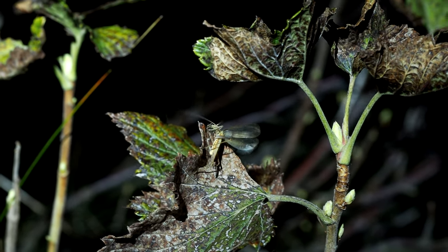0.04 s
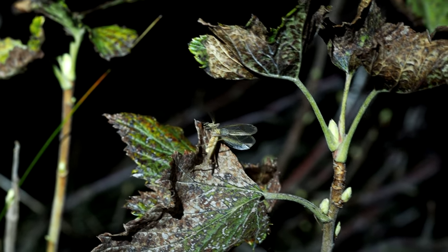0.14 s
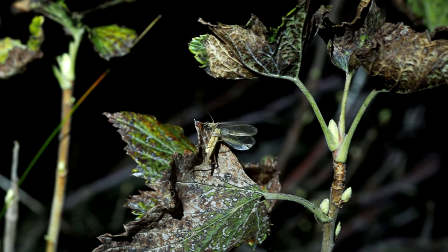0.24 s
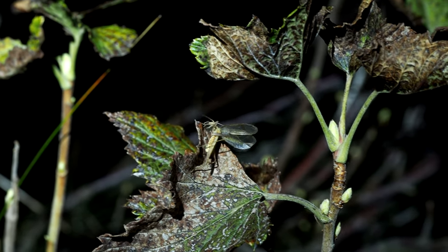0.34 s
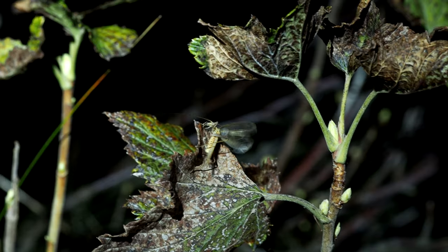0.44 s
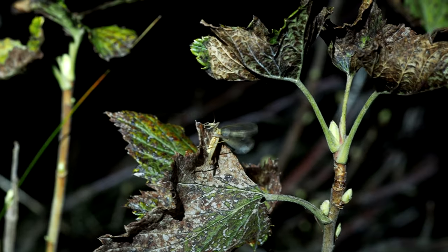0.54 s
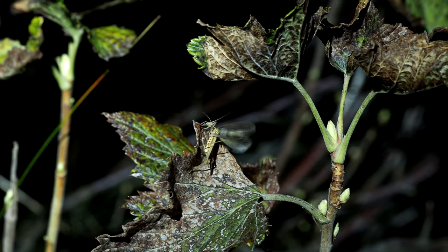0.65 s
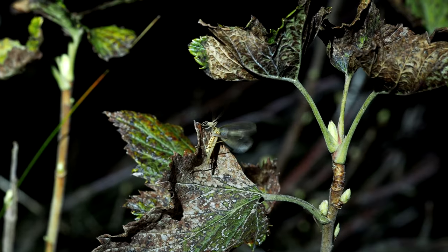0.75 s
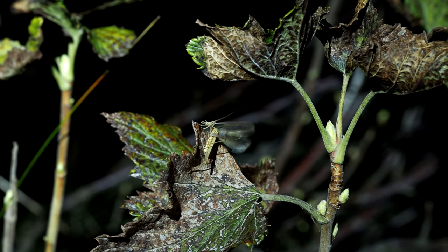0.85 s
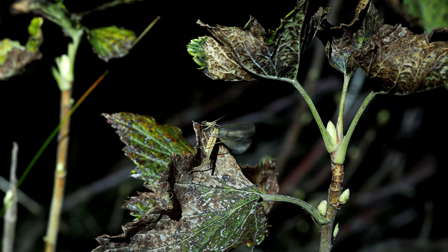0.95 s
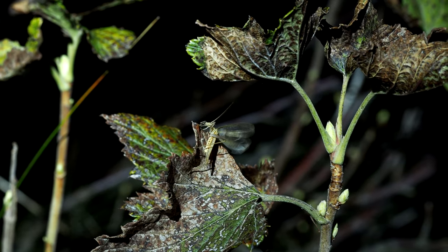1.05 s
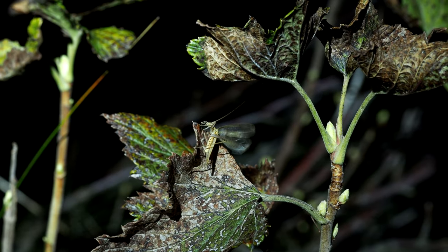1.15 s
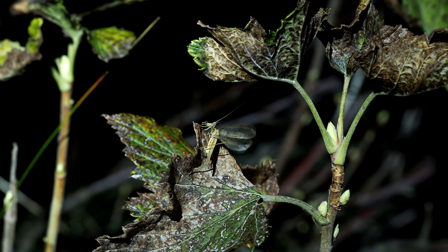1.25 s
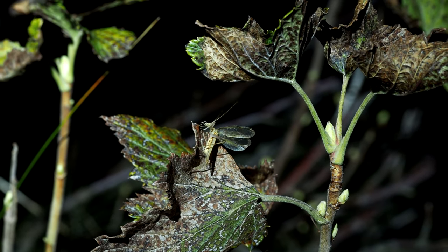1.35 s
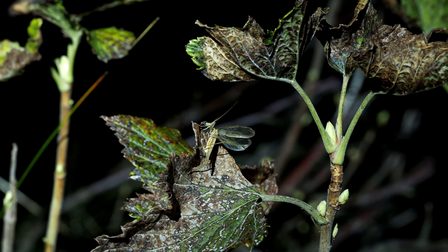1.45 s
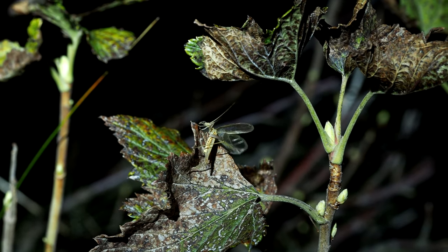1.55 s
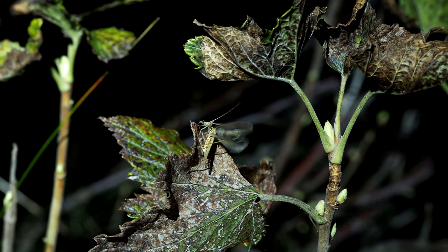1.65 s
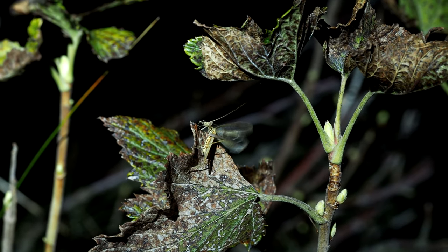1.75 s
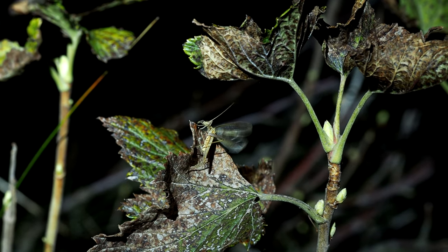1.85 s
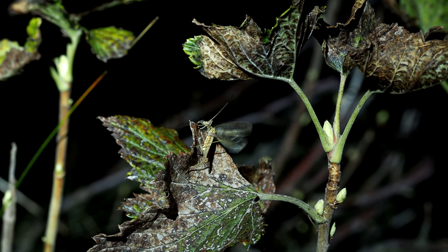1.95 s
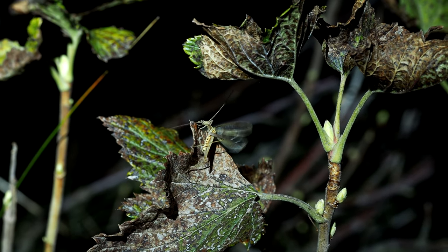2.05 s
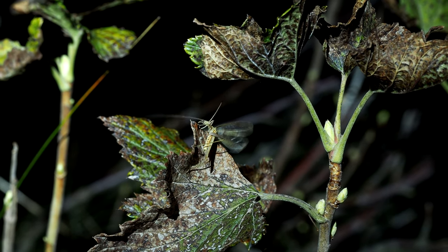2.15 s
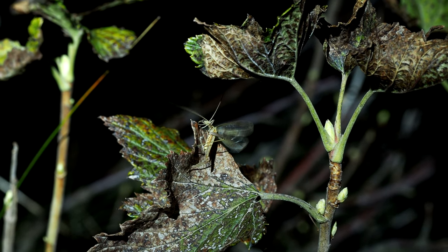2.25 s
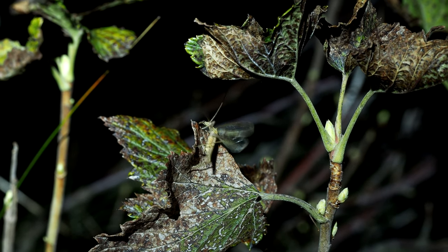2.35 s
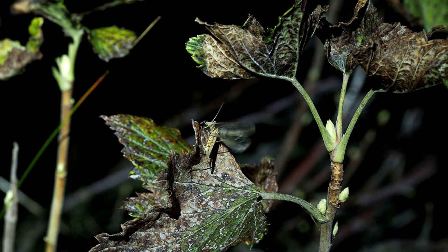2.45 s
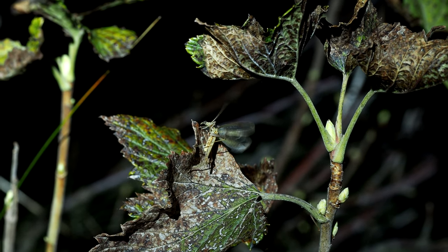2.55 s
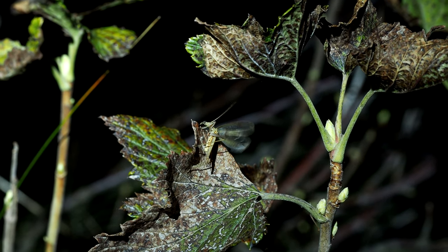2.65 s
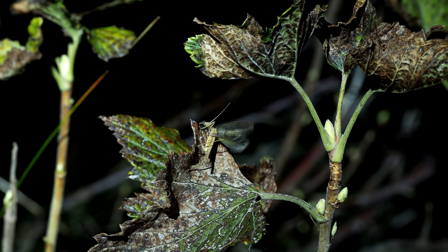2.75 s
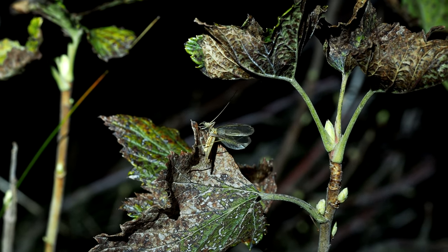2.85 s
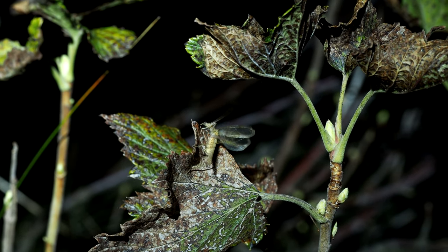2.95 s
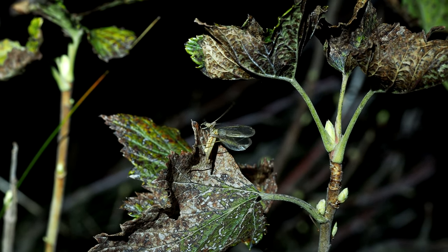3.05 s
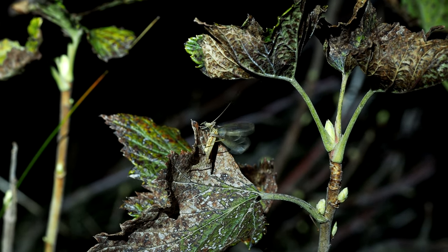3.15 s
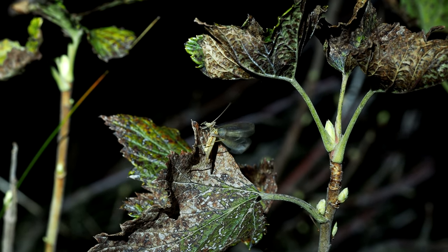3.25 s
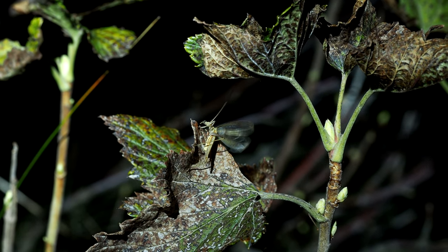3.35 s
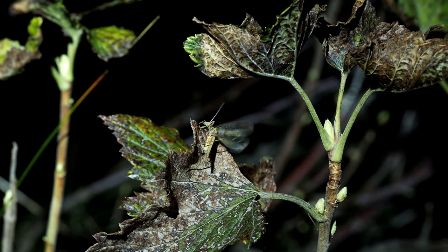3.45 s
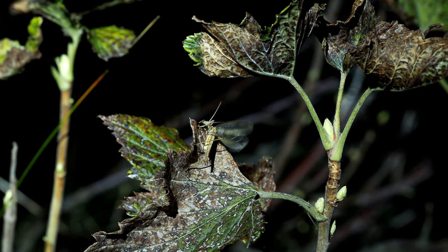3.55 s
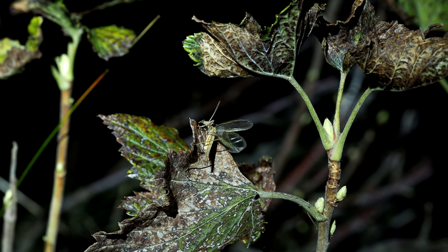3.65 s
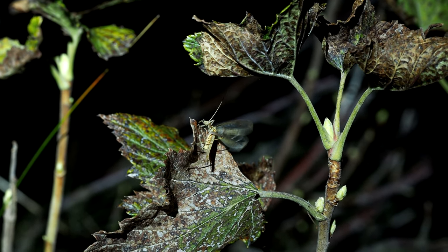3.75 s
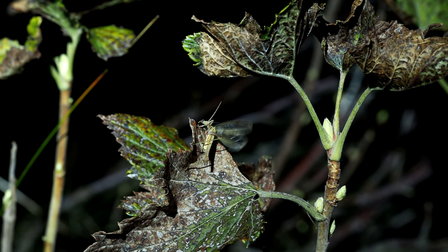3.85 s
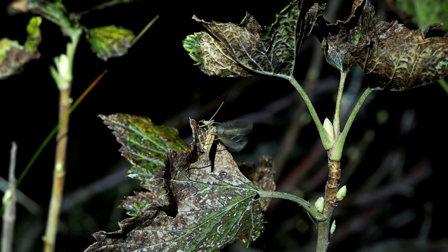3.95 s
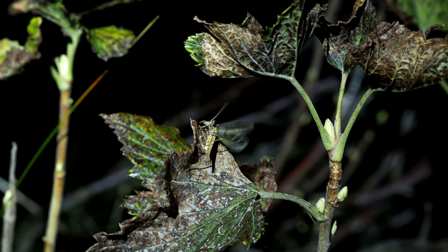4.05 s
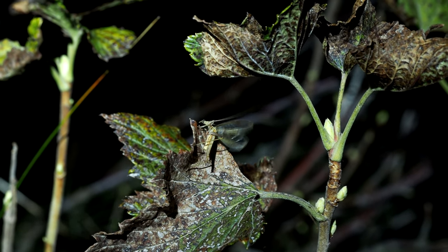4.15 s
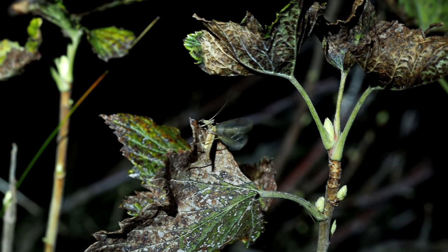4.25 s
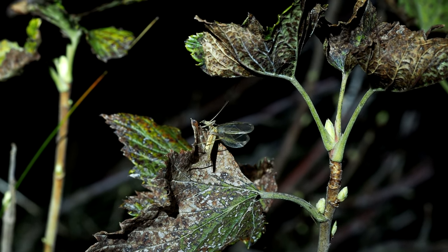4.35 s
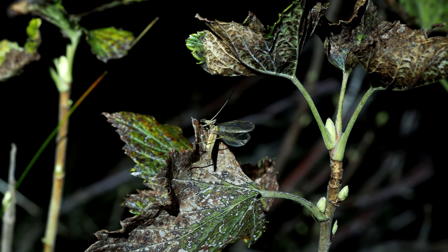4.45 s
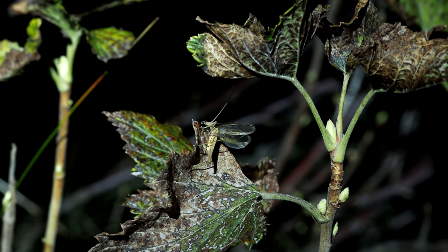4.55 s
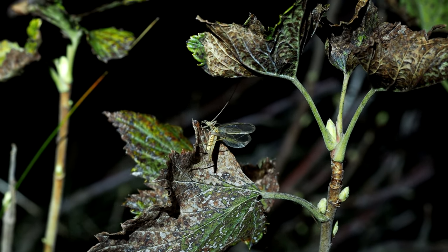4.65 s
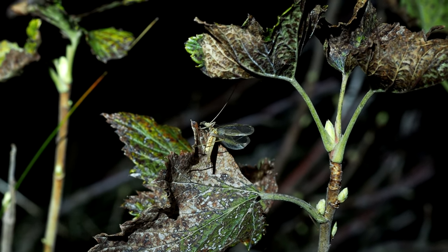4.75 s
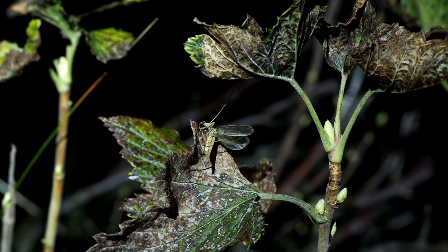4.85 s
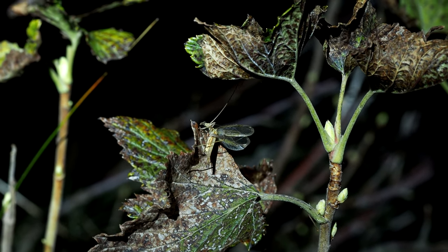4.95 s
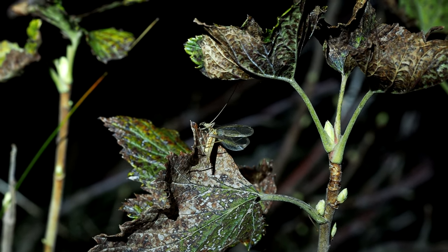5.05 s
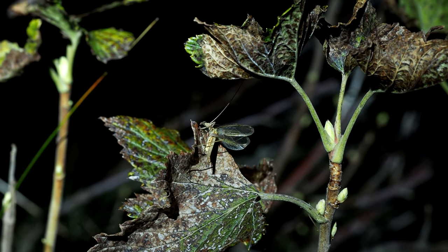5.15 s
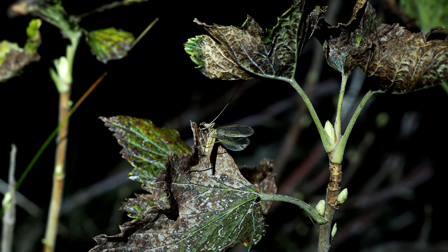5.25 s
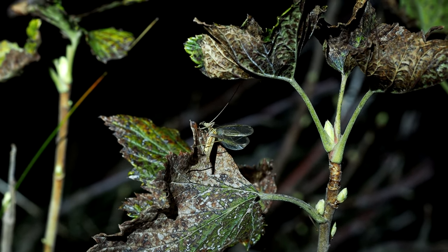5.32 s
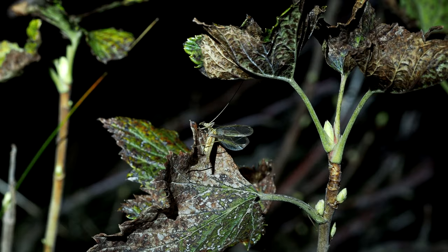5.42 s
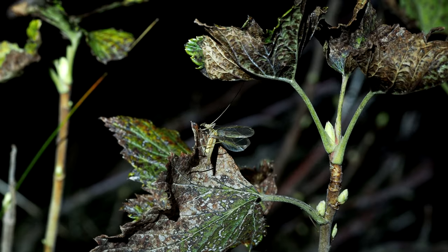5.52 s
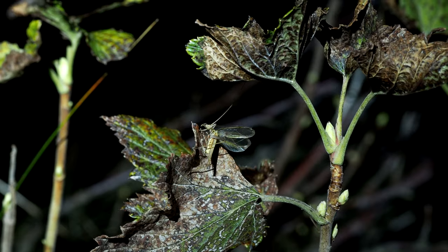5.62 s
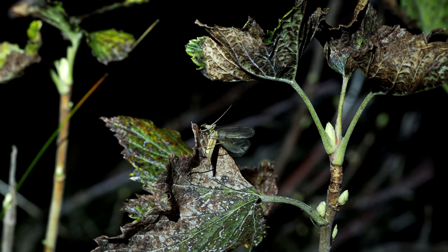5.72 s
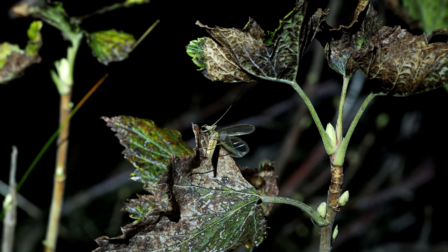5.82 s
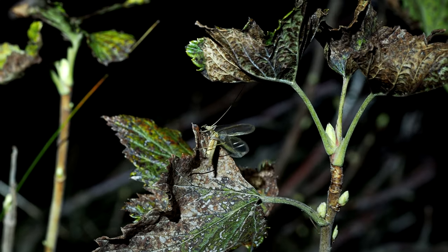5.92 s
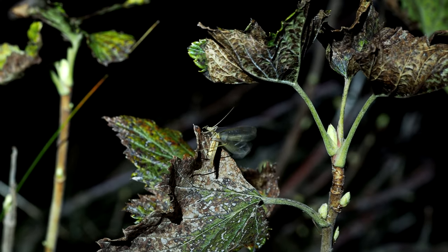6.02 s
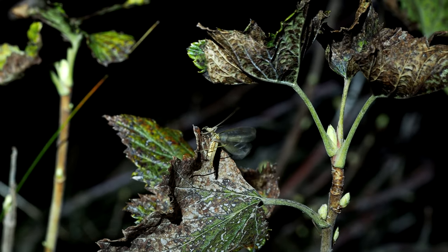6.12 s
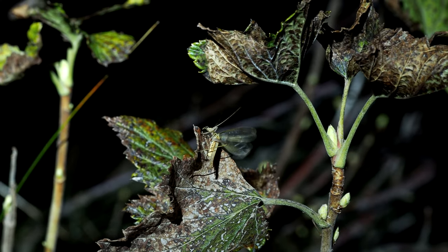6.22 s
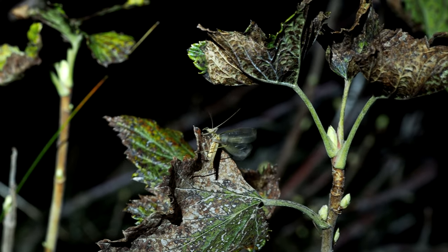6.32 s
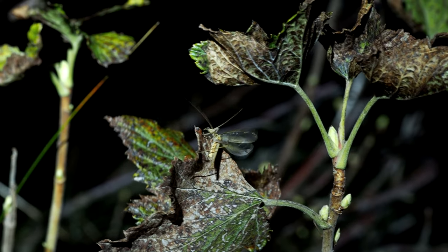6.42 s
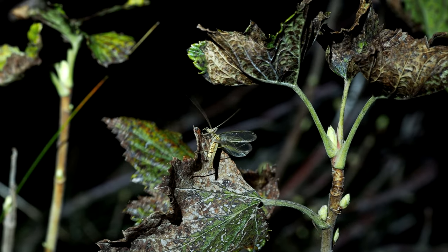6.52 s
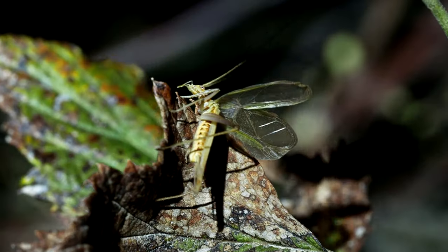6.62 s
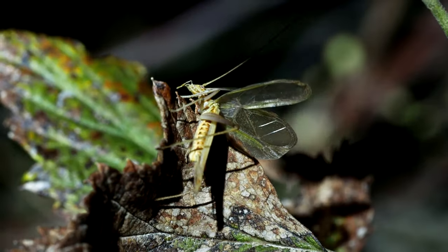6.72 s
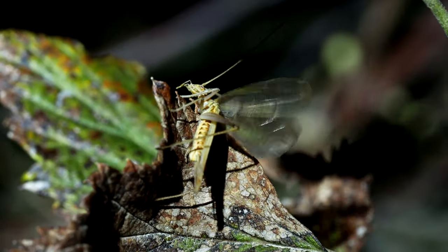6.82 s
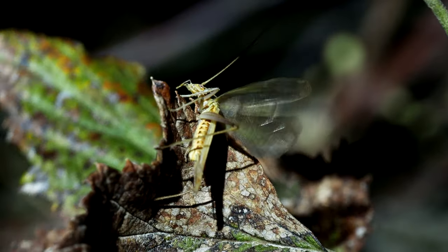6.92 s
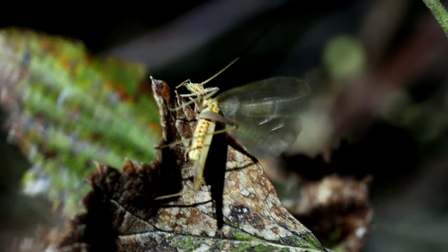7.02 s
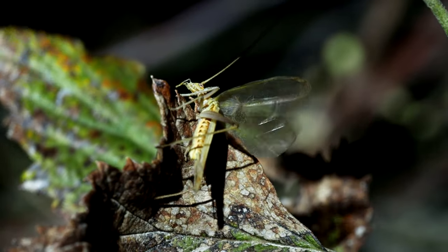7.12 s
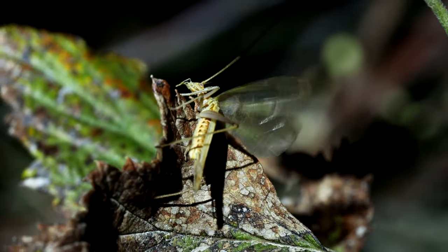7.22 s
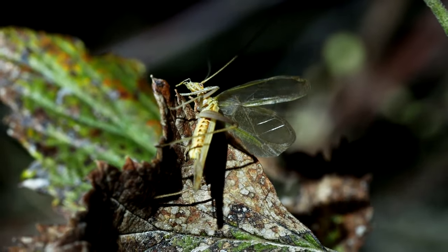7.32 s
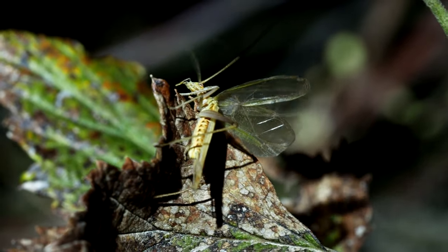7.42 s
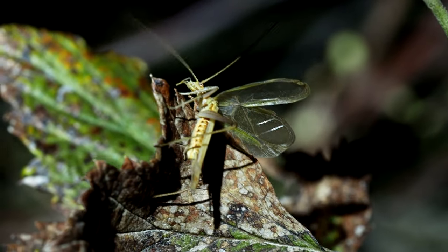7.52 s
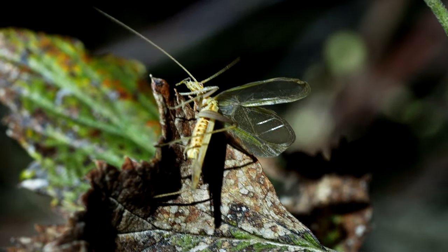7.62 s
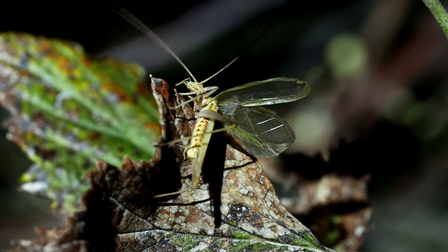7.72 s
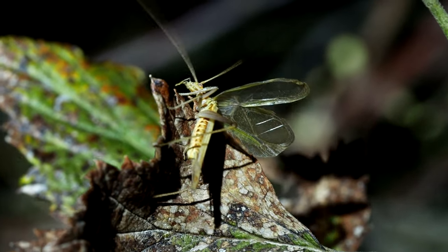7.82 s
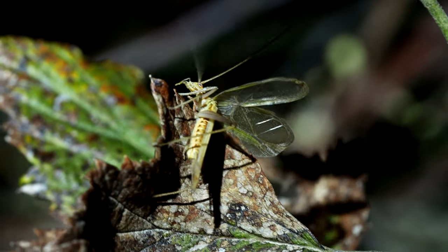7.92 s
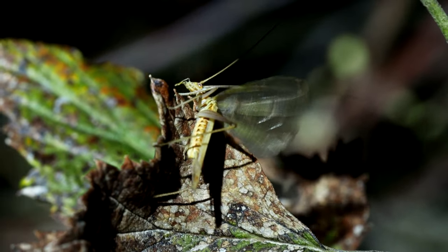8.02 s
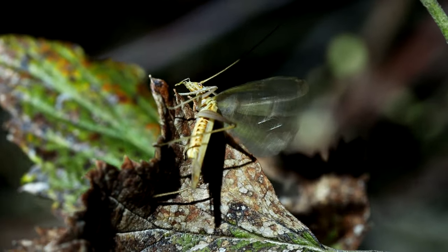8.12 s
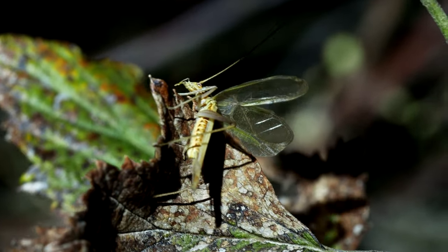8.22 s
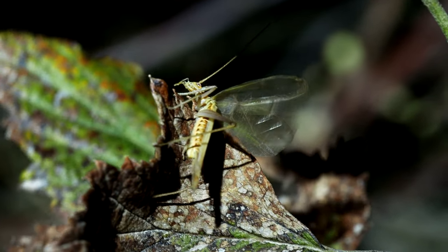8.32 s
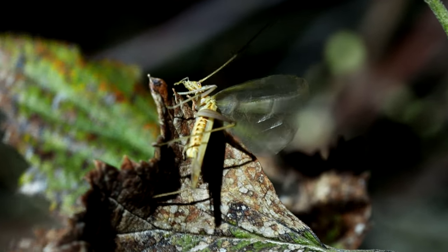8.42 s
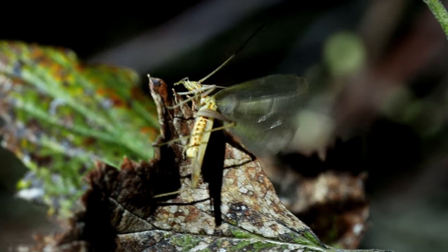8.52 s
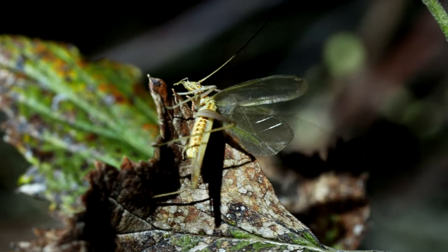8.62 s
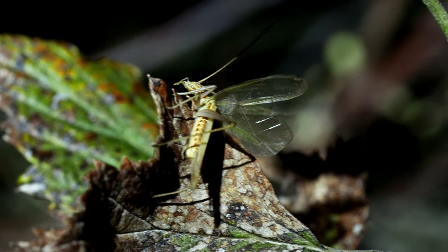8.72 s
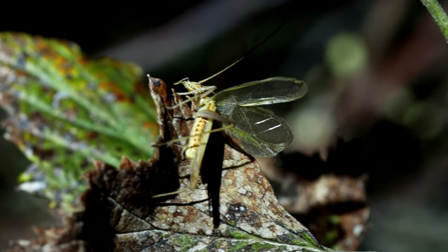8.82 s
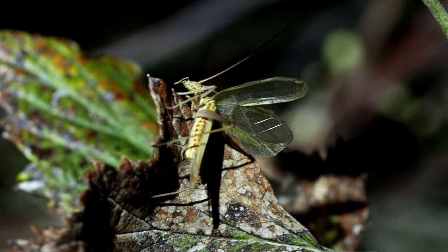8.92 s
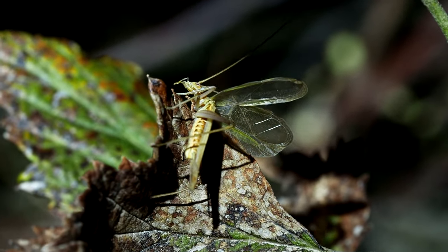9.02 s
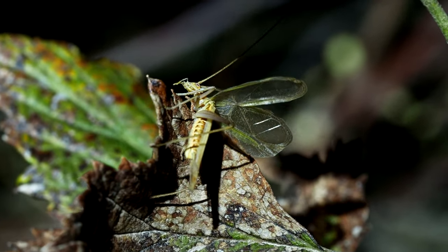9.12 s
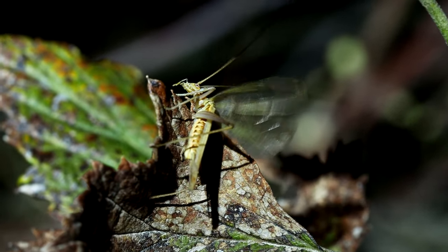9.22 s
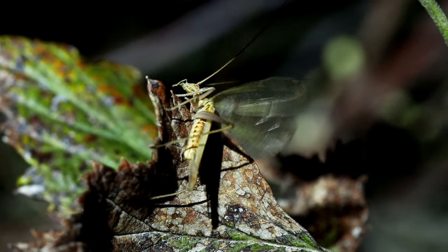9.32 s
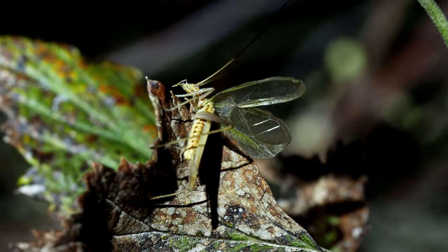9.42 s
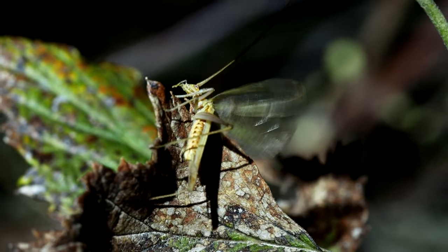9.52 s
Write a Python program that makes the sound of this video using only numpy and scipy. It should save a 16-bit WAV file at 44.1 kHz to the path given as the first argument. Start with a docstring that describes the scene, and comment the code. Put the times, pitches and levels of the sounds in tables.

```python
"""Tree cricket at night

A tree cricket on a leaf trills: bouts of some 29 wing strokes a second, each a pure tone that sags in pitch.
Now and then the scraper slips off the file and skids. From 6.6 s the microphone is closer to the insect.
Leaves scatter the song. A bush-cricket lisps in paired noise syllables, before a far chorus and faint tones.
Under it all lie shaped-noise hiss and a thin whine of steady sines, mostly on the right."""
import sys
import numpy as np
from scipy import signal
from scipy.fft import rfft, irfft, next_fast_len
from scipy.io import wavfile
from scipy.ndimage import uniform_filter1d, map_coordinates

SR = 44100
rng = np.random.default_rng(int(sys.argv[2]) if len(sys.argv) > 2 else 0)


def digitize_waveform(pressure):
    """Quantize a signal to 16-bit integers and store it at the path in sys.argv[1].

    Rows of a 2-D input are taken as channels; values are limited to [-1, 1].
    """
    field = np.atleast_2d(pressure).T
    bounded = np.clip(field, -1, 1)
    quanta = np.round(bounded * 32767).astype(np.int16)
    wavfile.write(sys.argv[1], SR, quanta)


N = 422037  # length in samples
STROKE_S = .0342  # wing-stroke period within a bout
CLOSER_S, CLOSER_DB = 6.6, 1.3  # when the microphone gets closer, and the gain on each wing stroke


def amp(db):
    """Decibels to gain."""
    return 10 ** (np.asarray(db) / 20)


def unit(x):
    """Scale to rms 1."""
    return x / np.sqrt(np.mean(x ** 2) + 1e-20)


def along(points, hz):
    """Read a curve of (f/Hz, value) points on a log frequency axis."""
    f, v = np.transpose(points)
    return np.interp(np.log(hz + 1), np.log(f + 1), v)


def filtered(x, response):
    """Shape the spectrum of x by a response of frequency, padded so the ends do not wrap round."""
    n = x.shape[-1]
    m = next_fast_len(n + 8192)
    spectrum = rfft(x, m) * response(np.fft.rfftfreq(m, 1 / SR))
    return irfft(spectrum, m)[..., :n]


def noise(spectrum):
    """Coloured noise of rms 1, unrelated left and right."""
    white = rng.standard_normal((2, N))
    return unit(filtered(white, lambda hz: amp(along(spectrum, hz))))


def wobble(rate, n):
    """A smooth random curve of n samples, through rate random knots a second."""
    knots = rng.standard_normal(n // 4 + 8)
    return map_coordinates(knots, [np.arange(n) * rate / SR + 2])


def add(track, s, sound):
    """Mix a sound into a track at time s."""
    i = max(round(s * SR), 0)
    part = track[..., i:i + sound.shape[-1]]
    part += sound[..., :part.shape[-1]]


def gate(t, edge):
    """A soft step from 0 to 1 at t = 0."""
    return .5 + .5 * np.tanh(t / edge)


def beats(first, last, period):
    """Evenly spaced times from first to last, about one period apart."""
    return np.linspace(first, last, round((last - first) / period) + 1)


# Noise colour of the far bush-crickets: f/Hz, level/dB (relative)
CHORUS_COLOUR = [(8500, -48), (9700, -20), (10500, -6), (12000, -1), (13000, -2), (14000, -6), (15700, -10)]
# Swell of the chorus, used about its own mean: t/s, level/dB
CHORUS_SWELL = [(0.0, -47), (0.69, -44), (1.77, -46), (2.38, -44), (2.86, -46), (3.75, -43), (4.31, -46),
                (8.76, -43), (9.05, -45), (9.5, -42)]
# Noise colour of the microphone hiss: f/Hz, level/dB (relative)
HISS_COLOUR = [(100, -49.5), (400, -32.5), (600, -24), (850, -13), (1500, -3.5), (2300, .5), (3300, -1),
               (4700, 2), (6400, -3.5), (8300, 3.5), (10000, -2), (15800, -6)]
# Steady sines of the electronic whine, as heard on the right: f/Hz, level/dB (rms)
WHINE_TONES = [(6388, -81), (7985, -72.5), (9582, -73), (10381, -70), (11179, -54.5), (12776, -54.5),
               (14373, -58)]


def night_floor(chorus_db=-42.1, swell_depth=.6, hiss_db=-56, whine_left_db=-20):
    """Far bush-crickets blur into swelling noise, over microphone hiss and an electronic whine."""
    t = np.arange(N) / SR
    swell_db = np.interp(t, *np.transpose(CHORUS_SWELL))
    swell_db = swell_depth * (swell_db - swell_db.mean())
    flicker_db = .3 * wobble(2, N) + .7 * wobble(40, N)
    chorus = amp(chorus_db + swell_db + flicker_db) * noise(CHORUS_COLOUR)
    hiss = amp(hiss_db) * noise(HISS_COLOUR)
    whine = sum(amp(db) * np.sqrt(2) * np.sin(2 * np.pi * hz * t) for hz, db in WHINE_TONES)
    return chorus + hiss + whine * amp([[whine_left_db], [0]])


# Bouts of evenly spaced wing strokes: first stroke t/s, last stroke t/s, level of the first stroke/dB
TRILL_BOUTS = [(.010, .010, -2), (.4181, 1.2069, -1.8), (1.5895, 2.7548, -1.6), (3.1002, 3.5784, -3.6),
               (3.6477, 4.2319, -.3), (5.9665, 6.3801, -.3), (6.882, 7.4585, -1.1), (8.049, 8.7607, -1.7),
               (9.2496, 9.5522, -4)]
# Moments when the scraper slips off the file in mid-stroke: t/s
SLIP_TIMES = [.028, .6672, .9018, 1.2225, 2.0115, 2.314, 2.778, 3.2075, 3.591, 3.996, 4.251, 5.980, 6.257,
              6.3855, 6.9195, 7.131, 7.366, 7.473, 8.135, 8.327, 8.392, 8.6675, 8.774, 9.2865, 9.3935,
              9.4565]
# Stray strokes in which the scraper only brushes the file: t/s, peak level/dB (before the wing filter)
STRAY_BRUSHES = [(.384, -25), (5.932, -25), (6.848, -25.5), (7.3225, -10.5), (7.984, -32.5), (8.015, -12.5),
                 (8.23, -7.5), (8.292, -19), (8.693, -14), (9.213, -27), (9.3485, -11)]
# Strokes that start with the scraper loose: t/s, catch after the start t/s, skid level/dB
# A catch at .05 s is too late to sound; one at 0 grips from the start.
LOOSE_STROKES = [(.353, .05, -25), (.691, .012, -7.5), (.932, .013, -9), (1.515, .05, -33.5),
                 (1.558, .05, -19.5), (2.033, 0, -14), (2.068, .05, -11), (3.235, .0135, -10.5),
                 (4.029, .05, -14), (6.001, 0, -14), (6.037, .05, -11), (6.276, .006, -6.5),
                 (6.81, .05, -30), (9.316, .012, -8)]
SKID_DB, SKID_LOSS_DB = -7, 14  # skid after the earliest slip, loss for a late one
MISS_DB, MISS_AFTER_S = -22, .033  # the brush that takes the place of the stroke after a slip


def trill(late_slip_s=.021):
    """Sort the strokes into clean, slipping and brushing: a later slip skids less, and the next stroke misses."""
    clean = []  # t/s, level/dB
    slipping = []  # t/s, level/dB, slip after t/s, skid level/dB
    brushes = list(STRAY_BRUSHES)

    def taken(s):
        """Whether a loose stroke or a brush already fills this beat."""
        return any(abs(row[0] - s) < STROKE_S / 2 for row in [*LOOSE_STROKES, *brushes])

    for first, last, first_db in TRILL_BOUTS:
        for k, s in enumerate(beats(first, last, STROKE_S)):
            if taken(s):
                continue
            db = first_db if k == 0 else 0
            after = next((slip - s for slip in SLIP_TIMES if 0 < slip - s < STROKE_S), None)
            if after is None:
                clean.append((s, db))
                continue
            skid_db = SKID_DB - SKID_LOSS_DB * (after / late_slip_s) ** 2
            slipping.append((s, db, after, skid_db))
            if not taken(s + STROKE_S):
                brushes.append((s + MISS_AFTER_S, MISS_DB))
    return clean, slipping, brushes


# A stroke swells and is braked: amplitude, then times
SWING, LEAD_S, ATTACK_S, RELEASE_S = .65, .0018, .0105, .0093
# Its pitch sags as the wing slows, then returns to the wing's own note
BITE_HZ, SAG_HZ_PER_S, BRAKE_HZ, REST_HZ = 2706, 6400, 115, 2590
REOPEN_DB, REOPEN_S, REOPEN_WIDTH_S = -35, .028, .003  # the faint tone of the wings reopening
SKID_RISE_S, SKID_S = .0015, .019  # rise and length of a skid


def stroke(s, db=0, grips=0, slips=1, skid_db=-120, rough=.11, edge_s=.0003, detune=.0022, skid_hz=28):
    """One wing closure as a complex tone: pure while the scraper grips the file, ragged while it skids."""
    t = np.arange(-SR // 250, SR // 20) / SR
    close = s > CLOSER_S
    attack = np.sin(np.pi / 2 * np.clip((t + LEAD_S) / ATTACK_S, 0, 1))
    release = np.exp(-(np.maximum(t + LEAD_S - ATTACK_S, 0) / RELEASE_S) ** 3)
    reopen = amp(REOPEN_DB) * np.exp(-((t - REOPEN_S) / REOPEN_WIDTH_S) ** 2)
    envelope = uniform_filter1d(attack * release + reopen, size=50)
    size = SWING * amp(db + CLOSER_DB * close) * envelope

    driven_hz = BITE_HZ - SAG_HZ_PER_S * t - BRAKE_HZ * (1 - release)
    hz = driven_hz + (REST_HZ - driven_hz) * gate(t - .024, .004)
    hz = hz * (1 + detune * rng.standard_normal())
    turn = 2 * np.pi * (np.cumsum(hz) / SR + rng.random())

    catches_late = grips > .004
    grip = gate(t - grips, edge_s) if catches_late else gate(slips - t, edge_s)
    # skidding, the scraper hits the teeth unevenly, the more so as the wing slows
    uneven = rough * np.interp(t, [0, .025], [.4, 2.2]) * (1.4 if close else .9)
    ragged = 1 + uneven * (wobble(700, len(t)) + 1j * wobble(700, len(t)))
    drift = 2 * np.pi * np.cumsum(skid_hz * wobble(150, len(t))) / SR
    # a slip at full swing sets the wing back by part of a cycle (radians)
    jolt = rng.uniform(.7, 1.2) * np.interp(slips, [.003, .008, .02, .023], [0, 1, 1, 0])
    lost_step = drift - np.interp(grips if catches_late else slips, t, drift) - jolt
    push = attack if catches_late else gate(t, SKID_RISE_S)
    fade = 1 / (1 + np.abs(t / SKID_S) ** 5)
    skid = amp(skid_db) * push * fade * ragged * np.exp(1j * lost_step)
    return s + t[0], (size * grip + (1 - grip) * skid) * np.exp(1j * turn)


def wings(clean, slipping, brushes, brush_hz=2750, brush_rise_s=.0019, brush_hold=1.3, brush_rough=.3):
    """The raised wings vibrate through all the strokes; a harder brush stays longer on the file."""
    swing = np.zeros(N, complex)
    for s, db in clean:
        add(swing, *stroke(s, db))
    for s, db, after, skid_db in slipping:
        add(swing, *stroke(s, db, slips=after, skid_db=skid_db))
    for s, after, skid_db in LOOSE_STROKES:
        add(swing, *stroke(s, grips=after, skid_db=skid_db))
    t = np.arange(SR // 40) / SR
    tone = np.exp(2j * np.pi * brush_hz * t)
    for s, db in brushes:
        u = t / (brush_rise_s * (1 + brush_hold * amp(db)))
        rough = 1 + brush_rough * wobble(900, len(t))
        add(swing, s, amp(db) * u * np.exp(1 - u) * rough * tone)
    return swing


def resonance(x, centre_hz, half_width_hz):
    """A wing resonance: a flat top with steep flanks."""
    return filtered(x, lambda hz: 1 / np.sqrt(1 + ((hz - centre_hz) / half_width_hz) ** 4))


# Wing resonances, one for each multiple of the tone:
# f/Hz, half width f/Hz, left level/dB, right level/dB, right leads by [radians], extra level when close/dB
WING_OVERTONES = [(2630, 2700, 0.5, 0.5, 0.096, -0.5), (5055, 230, -21, -25.5, 0.9, -3),
                  (7940, 380, -35.5, -22, 1.2, 2.5), (10620, 280, -48, -35, 2.3, 3.5)]
# Noise colour of the faint noise that rises and falls with each stroke: f/Hz, level/dB (relative)
STROKE_NOISE_COLOUR = [(500, -52), (1000, -28.5), (1500, 4), (2200, 9), (3000, -2), (4000, -26),
                       (5200, 0.5), (6500, -25), (8000, -6), (9200, -18.5), (11000, 0.5), (15500, -12.5)]
# Noise colour of the buzzing membrane, heard only close by: f/Hz, level/dB (relative)
BUZZ_COLOUR = [(1400, -32), (2200, -4), (3300, 0), (3900, -22), (4600, -45)]


def tree_cricket(swing, stroke_noise_db=-49.5, buzz_db=-40, close_pan_db=.67, flutter_db=1.8):
    """The wing tone with overtones beamed differently left and right, faint stroke noise and a close buzz."""
    wing_hz, wing_width_hz = 2480, 720
    full_swing, extra_slope = .68, .08  # reference amplitude, and the overtones' excess over proportion
    # the membrane cannot follow a slip at once
    tone = filtered(swing.real, lambda hz: 1 / (1 + ((hz - wing_hz) / wing_width_hz) ** 6))
    tone = signal.hilbert(tone, next_fast_len(N))[:N]
    size, turn = np.abs(tone), np.angle(tone)
    close = np.arange(N) / SR > CLOSER_S
    stroke_noise = amp(stroke_noise_db) * noise(STROKE_NOISE_COLOUR)
    buzz = amp(buzz_db) * close * noise(BUZZ_COLOUR)
    song = size * (stroke_noise + buzz)
    for k, (hz, width_hz, left_db, right_db, lead, close_db) in enumerate(WING_OVERTONES, 1):
        level = size * amp(close_db * close)
        if k > 1:  # overtones follow the tone almost in proportion, and flutter quickly
            level = level * (size / full_swing) ** extra_slope * amp(flutter_db * wobble(250, N))
        left = amp(left_db) * np.cos(k * turn - lead)
        right = amp(right_db) * np.cos(k * turn)
        song += resonance(level * np.array([left, right]), hz, width_hz)
    return song * amp(close_pan_db * np.outer([-1, 1], close))


# Noise colour of the loose scraper: f/Hz, level/dB (relative)
SCRAPE_COLOUR = [(1200, -46), (1900, -21), (2400, -4), (2750, 0), (3400, -8), (4100, -29), (5300, -17),
                 (6500, -37), (8000, -19), (9300, -32), (12000, -20), (15500, -28)]


def scrape(swing, slipping, brushes, far_db=-45, close_db=-33, brush_db=-1, reopen_db=-11):
    """Dry scratching of the loose scraper: as the wings reopen, through each skid and around each brush."""
    reopen_delay_s, fade_s, brush_width_s = .011, .025, .0043
    grain_db, spread = 3, .45  # graininess, and stereo width of the scratching
    time = np.arange(N) / SR
    level = amp(reopen_db) * np.interp(time - reopen_delay_s, time, np.abs(swing))
    t = np.arange(-SR // 20, SR // 6) / SR
    scratch = 2 * gate(t, .001) * np.exp(-np.abs(t) / fade_s)
    for s, _, after, skid_db in slipping:
        add(level, s + after + t[0], amp(skid_db / 2) * scratch)
    for s, _, skid_db in LOOSE_STROKES:
        add(level, s + t[0], amp(skid_db / 2) * scratch)
    for s, db in brushes:
        add(level, s + t[0], amp(brush_db + db / 4) * np.exp(-np.abs(t) / brush_width_s))
    mid, side = noise(SCRAPE_COLOUR)
    stereo = np.array([mid + spread * side, mid - spread * side])
    grains = unit(stereo * amp(grain_db * wobble(800, N)))
    return level * amp(np.where(time > CLOSER_S, close_db, far_db)) * grains


# Response of sound scattered by leaves: f/Hz, level/dB
FOLIAGE_RESPONSE = [(2600, -35.5), (3500, -22.5), (5200, -12), (8000, -11), (12000, -9)]


def foliage(x, t60_s=.19, delay_s=.0025):
    """Leaves and ground scatter a short, thin tail: decaying noise convolved with the song."""
    t = np.arange(SR // 3) / SR
    tail = rng.standard_normal((2, len(t))) * amp(-60 * t / t60_s) * gate(t - delay_s, .0011)
    tail /= np.linalg.norm(tail, axis=1, keepdims=True)
    scattered = signal.fftconvolve(x, tail, axes=1)[:, :N]
    return filtered(scattered, lambda hz: amp(along(FOLIAGE_RESPONSE, hz)))


# Noise colour of the bush-cricket's lisp: f/Hz, level/dB (relative)
LISP_COLOUR = [(8000, -57.5), (9500, -26), (10500, -10.5), (11700, -4.5), (12700, 1.5), (13400, -2),
               (14200, -10.5), (15800, -20)]
# Verses: first pair of syllables t/s, last pair t/s, level/dB (before the overall level)
LISP_VERSES = [(.306, .551, -36), (.688, 1.426, -36.5), (1.914, 2.274, -34), (2.426, 2.788, -35),
               (3.011, 4.096, -33), (4.406, 6.85, -34.5), (6.931, 7.178, -28), (7.36, 9.429, -31)]
PAIR_S = .122  # from one pair of syllables to the next
VERSE_RISE_DB, VERSE_RISE_S = 5, .25  # each verse starts softly


def bush_cricket(gap_s=.04, width_s=.007, linger_s=.018, echo=.4, level_db=-4.5, grain_db=1.5, scatter_db=1.1):
    """Verses of short scratchy noise syllables, two at a time, each trailing off in the bushes."""
    t = np.arange(-SR // 40, SR // 10) / SR
    trail = echo * gate(t, .003) * np.exp(-np.abs(t) / linger_s)
    syllable = np.exp(-(t / width_s) ** 2) + trail
    level = np.zeros(N)
    for first, last, verse_db in LISP_VERSES:
        for s in beats(first, last, PAIR_S):
            db = verse_db - VERSE_RISE_DB * np.exp((first - s) / VERSE_RISE_S)
            for start in (s, s + gap_s):
                add(level, start + t[0], amp(db + rng.normal(0, scatter_db)) * syllable)
    grains = unit(noise(LISP_COLOUR) * amp(grain_db * wobble(900, N)))
    return amp(level_db) * level * grains


# Faint far-off tones: centre t/s, length t/s, f/Hz, level/dB
DISTANT_TONES = [(2.811, .04, 880, -83), (4.793, .04, 1055, -78), (6.86, .24, 890, -80)]


def far_tones(blur_rate=170):
    """A few soft tones from far away, blurred by a random complex wobble of blur_rate knots a second."""
    t = np.arange(N) / SR
    blur = unit(wobble(blur_rate, N) + 1j * wobble(blur_rate, N))
    tones = np.zeros(N)
    for s, length, hz, db in DISTANT_TONES:
        swell = np.exp(-(2 * (t - s) / length) ** 2)
        tones += amp(db) * swell * np.real(blur * np.exp(2j * np.pi * hz * t))
    return tones


def scene():
    """The near singer among leaves, with the night behind it."""
    clean, slipping, brushes = trill()
    swing = wings(clean, slipping, brushes)
    song = tree_cricket(swing) + scrape(swing, slipping, brushes)
    return night_floor() + song + foliage(song) + bush_cricket() + far_tones()


def record(dry, low_cut_hz=549, top_hz=15800):
    """A steep low cut, then the band limit."""
    return filtered(dry, lambda hz: (hz < top_hz) / np.sqrt(1 + (low_cut_hz / (hz + 1)) ** 6))


dry = scene()
out = record(dry)
digitize_waveform(out)
```